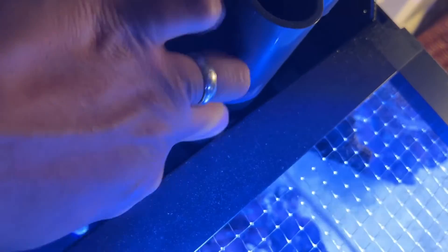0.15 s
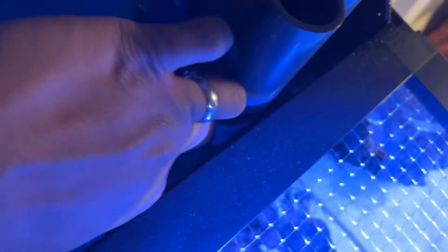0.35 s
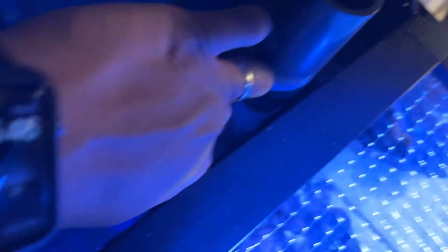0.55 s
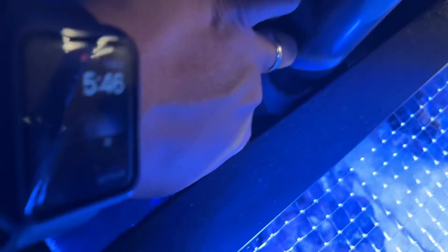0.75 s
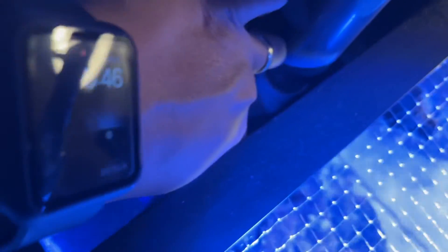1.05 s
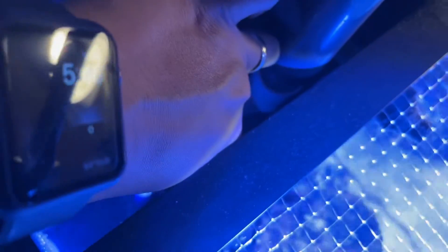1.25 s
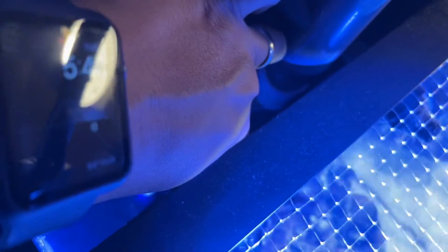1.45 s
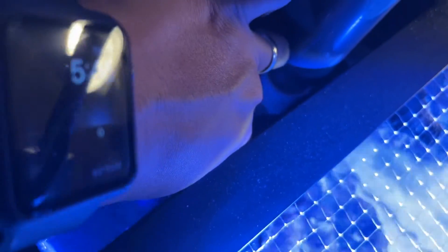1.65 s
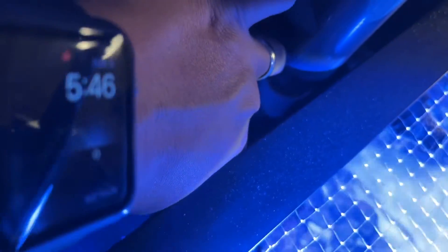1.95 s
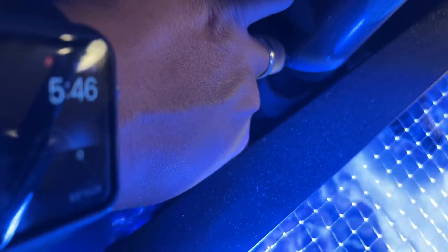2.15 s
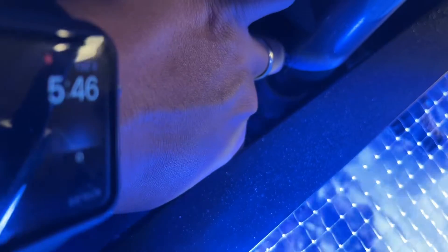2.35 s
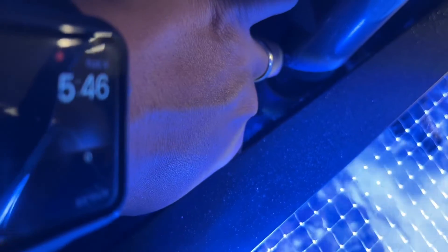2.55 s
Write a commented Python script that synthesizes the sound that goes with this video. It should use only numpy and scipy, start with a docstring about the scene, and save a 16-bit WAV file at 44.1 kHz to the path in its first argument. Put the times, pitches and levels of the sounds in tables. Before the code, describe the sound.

Trickling water with bubbly plips and small splashes in a tank, a pump humming and ticking underneath

```python
"""A pump hums at twice the mains rate, close over the narrow rear chambers of an aquarium: a wavering sine,
fluttering noise bands and a rumble. Something on it ticks eleven times a second, as short damped knocks.
Water trickles over the baffles: drips and bubbles are damped sines, splashes and hiss are shaped noise.
Two microphone ports hear the water out of step at many pitches."""
import sys
import numpy as np
from scipy import signal
from scipy.fft import rfft, irfft, next_fast_len
from scipy.io import wavfile
from scipy.ndimage import uniform_filter1d, map_coordinates

SR = 44100
rng = np.random.default_rng(int(sys.argv[2]) if len(sys.argv) > 2 else 0)


def transcribe(signal):
    """Save signal, clipped to [-1, 1], as a 16-bit WAV file at the path in sys.argv[1]."""
    frames = np.atleast_2d(signal).T
    limited = np.clip(frames, -1, 1)
    pcm = np.round(limited * 32767).astype(np.int16)
    wavfile.write(sys.argv[1], SR, pcm)


N = 119070


def amp(db):
    """Amplitude factor of a level in dB."""
    return 10 ** (np.asarray(db) / 20)


def unit(x):
    """x scaled to an RMS of 1 over all its channels."""
    return x / np.sqrt(np.mean(x ** 2) + 1e-20)


def along(points, hz):
    """Interpolate (Hz, value) points on a log frequency axis."""
    f, v = np.transpose(points)
    return np.interp(np.log(hz + 1), np.log(f + 1), v)


def wobble(knots_per_s):
    """A smooth random curve through normally distributed knots."""
    knots = rng.standard_normal(int(N * knots_per_s / SR) + 4)
    return map_coordinates(knots, [np.arange(N) * knots_per_s / SR])


def filtered(x, response):
    """x through a complex response of frequency in Hz."""
    size = next_fast_len(N + SR // 2)
    spectrum = rfft(x, size) * response(np.fft.rfftfreq(size, 1 / SR))
    return irfft(spectrum, size)[..., :N]


def patchy(patchy_db):
    """Two white noises sharing time-frequency patches of random gain, patchy_db RMS."""
    z = signal.stft(rng.standard_normal((2, N)), nperseg=512)[2]
    field = uniform_filter1d(rng.standard_normal(z.shape[1:]), size=5, axis=0)
    field = uniform_filter1d(field, size=6, axis=1)
    return signal.istft(z * amp(patchy_db * unit(field)), nperseg=512)[1][:, :N]


def random_db(u, spread_db):
    """Exponentially spread levels from uniform draws u, capped at the top."""
    return -spread_db * np.log(1 - .985 * u)


def pings(s, db, hz, t60_s, attack_s, rise, size=2048):
    """Damped sines whose pitch climbs by the share rise over a t60."""
    t = np.arange(size) / SR
    s, db, hz, t60_s = (np.asarray(v, float)[:, None] for v in (s, db, hz, t60_s))
    tone = np.sin(2 * np.pi * hz * (t + rise * t * t / (2 * t60_s)))
    wave = amp(db - 60 * t / t60_s) * (1 - np.exp(-t / attack_s)) * tone
    at = (s * SR).astype(int) + np.arange(size)
    return np.bincount(at.ravel(), wave.ravel(), N + SR)[:N]


HUM_HZ, HUM_START_RAD, HUM_DRIFT_RAD = 120, 3.75, .08
RUMBLE_DB = -46.5
# Hum level. Each row: time in seconds, RMS level ahead of the ports in dB.
HUM_LEVEL = [(0.0, -38.5), (0.04, -36), (0.3, -36), (0.96, -38.5), (1.07, -37.5), (1.19, -40),
             (1.44, -37.5), (2.65, -37.5), (2.7, -38)]
# Motor rumble through the stand. Each row: frequency in Hz, relative density in dB per Hz.
RUMBLE_SPECTRUM = [(20, -81), (30, -40), (58, -2.5), (68, -13.5), (100, -6.5), (150, -1), (200, -4.5),
                   (300, -9.5), (400, -15), (520, -21), (800, -26.5), (1500, -97)]
# Fluttering motor tones. Each row: centre in Hz, width in Hz (centre to e^-2 amplitude), RMS level in dB.
WHIRR_BANDS = [(80.8, 2.8, -56.5), (136.5, 22, -50), (179.7, 11, -53.5), (219.6, 10.4, -59),
               (298.8, 5.4, -62.5)]


def pump():
    """Motor vibration: a slightly wavering hum, narrow noise bands that flutter and a broad rumble."""
    t = np.arange(N) / SR
    phase = 2 * np.pi * HUM_HZ * t + HUM_START_RAD + HUM_DRIFT_RAD * wobble(5.6)
    hum_db = np.interp(t, *np.transpose(HUM_LEVEL))
    hum = np.sqrt(2) * amp(hum_db) * np.sin(phase)
    shaped = filtered(patchy(patchy_db=.7), lambda f: amp(along(RUMBLE_SPECTRUM, f)))
    motor = amp(RUMBLE_DB) * unit(shaped)
    for hz, width_hz, db in WHIRR_BANDS:
        noise = rng.standard_normal((2, N))
        band = filtered(noise, lambda f: np.exp(-2 * ((f - hz) / width_hz) ** 2))
        motor = motor + amp(db) * unit(band)
    return motor + hum * [[1], [0]]  # hum only in the shared signal


TICK_SCATTER_DB, TICK_PITCH_SCATTER, TICK_JITTER_S = 2.5, .05, .0005
TICK_PAN_DB = 3.5  # up on the left, down on the right
TICK_ECHO_S, TICK_ECHO_DB = .0068, -3  # off the glass into the right port
# The ticks. Each row: start in seconds, nominal level in dB ahead of scatter and pan.
TICK_TIMES = [(0.0258, -43), (0.1156, -40.5), (0.2064, -41.5), (0.2947, -40.5), (0.3825, -43),
              (0.4708, -40.5), (0.5581, -40.5), (0.6464, -45.5), (0.7342, -44.5), (0.8235, -42),
              (0.9123, -44), (1.0021, -44.5), (1.0929, -44), (1.1812, -40.5), (1.268, -46), (1.3563, -44),
              (1.4441, -43.5), (1.5349, -45.5), (1.6254, -44.5), (1.7125, -44), (1.8043, -43.5),
              (1.8941, -42), (1.9819, -42.5), (2.0687, -43), (2.1575, -45), (2.2433, -42), (2.3311, -40.5),
              (2.4214, -44), (2.5112, -46), (2.5985, -44), (2.6874, -42.5)]
# Partials of a tick. Each row: nominal pitch in Hz, level over the tick's in dB, t60 in s, delay in s.
TICK_PARTIALS = [(1300, 4, .013, 0), (1100, 1, .012, .0015), (880, 1, .02, .0035), (740, -4, .02, .005)]


def ticking():
    """A nearly regular tick that falls from a higher to a lower knock, nearer the left port."""
    s, db = np.transpose(TICK_TIMES)
    left = np.zeros(N)
    for hz, level_db, t60_s, delay_s in TICK_PARTIALS:
        db_luck, hz_luck, time_luck = rng.standard_normal((3, len(s)))
        left += pings(s + delay_s + TICK_JITTER_S * time_luck,
                      db + level_db + TICK_SCATTER_DB * db_luck,
                      hz * (1 + TICK_PITCH_SCATTER * hz_luck),
                      np.full(len(s), t60_s), attack_s=.00059, rise=0)
    echo = np.pad(left, (round(TICK_ECHO_S * SR), 0))[:N]
    right = left + amp(TICK_ECHO_DB) * echo
    return np.array([left, right]) * amp([[TICK_PAN_DB], [-TICK_PAN_DB]])


DRIP_HZ, DRIP_SCATTER, DRIP_T60_S = 1530, .015, .03
RING_HZ, RING_DB, RING_T60_S = 1560, -15.5, .12  # level relative to the drip
# Drips that ring the air in one chamber. Each row: start in seconds, knock level in dB.
DRIP_TIMES = [(.540, -33.5), (.552, -38), (0.576, -28.5), (.602, -45), (0.732, -42), (.980, -40),
              (1.035, -36), (1.076, -38), (1.11, -35), (1.126, -35.5), (1.560, -34), (1.577, -25.5),
              (1.609, -32), (1.624, -43), (1.643, -45), (1.675, -36), (1.701, -41), (1.731, -42),
              (1.757, -40), (1.777, -33.5), (1.826, -48), (1.863, -44), (1.984, -34), (2.122, -31.5),
              (2.170, -39), (2.231, -34), (2.305, -35.5), (2.360, -44), (2.393, -42), (2.469, -40),
              (2.523, -45)]


def drips():
    """Every drip knocks a hollow note out of step at the ports; a thinner note lingers in both alike."""
    s, db = np.transpose(DRIP_TIMES)
    one = np.ones(len(s))
    hz = DRIP_HZ * (1 + DRIP_SCATTER * rng.standard_normal(len(s)))
    knock = pings(s, db, hz, DRIP_T60_S * one, attack_s=.0015, rise=.012)
    ring = pings(s, db + RING_DB, RING_HZ * one, RING_T60_S * one, attack_s=.0074, rise=0, size=6144)
    return ports(walls(knock)) + ring


POP_DB, POP_OCTAVES, POP_SHORTER = -6, .2, 2.5  # level and t60 divisor relative to the bubble
# The clearest bubbles. Each row: start in seconds, level in dB, starting pitch in Hz, t60 in ms.
BUBBLE_EVENTS = [(0.033, -39, 715, 26), (0.111, -37, 12900, 9.5), (0.112, -46, 2640, 18),
                 (0.147, -38, 965, 20), (0.154, -51, 2540, 25), (0.166, -48, 2540, 25),
                 (0.2606, -29.5, 4430, 6.7), (0.2641, -50, 14210, 10), (0.2651, -38, 11900, 8.9),
                 (0.3085, -43, 7160, 12), (0.3314, -41, 7160, 11), (0.3384, -49, 14130, 10),
                 (0.3559, -39, 8300, 14), (0.3563, -34.5, 9800, 7.8), (0.373, -35.5, 1730, 11),
                 (0.3898, -48, 8480, 10), (0.3998, -47, 8400, 22), (0.404, -36, 11100, 6.4),
                 (0.4133, -44, 7760, 8), (0.415, -35.5, 718, 37), (0.457, -42, 2400, 18),
                 (0.477, -47, 2520, 17), (0.4691, -52, 14660, 8), (0.4856, -41, 7000, 10),
                 (0.5022, -43, 4460, 14), (0.5624, -55, 8200, 14), (0.5679, -41.5, 6050, 11),
                 (0.6434, -37, 1670, 26), (0.6592, -42, 2120, 22), (0.6694, -45.5, 4500, 20),
                 (0.7635, -35, 717, 66), (0.833, -38.5, 5770, 13.6), (0.837, -42.5, 1670, 30),
                 (0.839, -36.5, 950, 23), (0.8642, -42, 8440, 8), (0.9017, -34.5, 1810, 21.5),
                 (0.9076, -38, 4200, 12), (0.95, -45, 2600, 18), (1.034, -45, 2400, 18),
                 (1.0353, -42, 4940, 15), (1.0515, -41.5, 4180, 21), (1.1092, -42, 11850, 13),
                 (1.1301, -47, 13200, 12), (1.1803, -31, 6070, 6.2), (1.22, -41, 1940, 19),
                 (1.2213, -27.5, 3250, 12.5), (1.2384, -43, 6080, 22), (1.3227, -38, 5860, 10.5),
                 (1.4374, -41, 7170, 11), (1.4595, -33, 2650, 13), (1.5083, -40, 9900, 9.4),
                 (1.5337, -26, 7660, 7.3), (1.562, -44, 1800, 20), (1.6, -41, 1700, 24),
                 (1.619, -43, 11580, 8), (1.6789, -39, 14400, 11), (1.6887, -16.5, 8900, 5.2),
                 (1.746, -46, 2540, 28), (1.7873, -36, 5620, 8.3), (1.848, -39.5, 720, 39),
                 (1.8754, -40, 5600, 9.4), (1.8872, -35.5, 5600, 7.4), (2.023, -32.5, 940, 23),
                 (2.0665, -35, 9700, 9.6), (2.1397, -37, 5920, 8.6), (2.221, -33.5, 5920, 7.4),
                 (2.325, -42, 1830, 20), (2.36, -41.5, 1765, 22), (2.3638, -42, 4220, 16),
                 (2.4033, -33, 4510, 7.8), (2.5249, -31.5, 973, 28), (2.531, -45, 5960, 11)]


def bubbles():
    """A bubble rings on a slightly rising pitch; two shorter, detuned pings make its rough pop."""
    s, db, hz, t60_ms = np.transpose(BUBBLE_EVENTS)
    t60_s = t60_ms / 1000
    x = pings(s, db, hz, t60_s, attack_s=.001, rise=.012)
    for detune in rng.standard_normal((2, len(s))):
        pop_hz = hz * 2 ** (POP_OCTAVES * detune)
        x += pings(s, db + POP_DB, pop_hz, t60_s / POP_SHORTER, attack_s=.00054, rise=0)
    return x


# Each row: start in seconds, level in dB (10 above burst RMS), centre in Hz, sigma in octaves, t60 in ms.
SPLASH_EVENTS = [(0.4587, -17.5, 9500, 1.6, 5.6), (0.598, -41, 2100, .3, 47), (0.902, -38, 2200, 0.73, 14),
                 (1.071, -28.5, 11000, 0.44, 11.3), (1.128, -37, 2280, 0.19, 29),
                 (1.2193, -19, 4230, .85, 12.5), (1.556, -40, 1900, 0.33, 42),
                 (1.581, -29.5, 8500, 0.42, 10.5), (1.6785, -35, 12500, .4, 11),
                 (1.873, -37, 13000, .4, 9.4), (2.305, -42, 1900, .3, 45), (2.3552, -32.5, 6500, 0.32, 8.7),
                 (2.394, -23.5, 10700, 0.18, 8), (2.454, -43, 14000, .3, 8)]


def splashes():
    """A splash is a short decaying burst of noise in a bell-shaped band."""
    x = np.zeros(N)
    t, f = np.arange(1024) / SR, np.fft.rfftfreq(1024, 1 / SR)
    for s, db, hz, octaves, t60_ms in SPLASH_EVENTS:
        band = np.exp(-.5 * (np.log2((f + 1) / hz) / octaves) ** 2)
        burst = unit(irfft(rfft(rng.standard_normal(len(t))) * band))
        envelope = amp(db - 10 - 60000 * t / t60_ms) * (1 - np.exp(-t / .00066))
        x[round(s * SR):][:len(t)] += envelope * burst
    return x


BURBLE_DB, BURBLE_PER_S, BURBLE_SPREAD_DB = -60, 220, 3
BURBLE_LOW_HZ, BURBLE_HIGH_HZ, BURBLE_CYCLES = 650, 2600, 26  # mean cycles per t60


def burble():
    """Larger bubbles scattered through the flow, the lower ones louder by 5 dB an octave."""
    when, pitch, loud, long = rng.random((4, int(BURBLE_PER_S * N / SR)))
    hz = BURBLE_LOW_HZ * (BURBLE_HIGH_HZ / BURBLE_LOW_HZ) ** pitch
    db = random_db(loud, BURBLE_SPREAD_DB) - 5 * np.log2(hz / 1000)
    t60_s = BURBLE_CYCLES * (.5 + long) / hz
    x = pings(when * N / SR, db, hz, t60_s, attack_s=.001, rise=.05)
    return amp(BURBLE_DB) * unit(walls(x))


HISS_DB, FIZZ_DB = -51.5, -58  # RMS ahead of the flow's swing
FIZZ_PER_S, FIZZ_SPREAD_DB = 1500, 2
FIZZ_LOW_HZ, FIZZ_HIGH_HZ, FIZZ_CYCLES_AT_1KHZ = 606, 15400, 13  # mean cycles per t60
# Running water as the chambers colour it. Each row: frequency in Hz, relative density in dB per Hz.
CHAMBER_COLOUR = [(300, -40), (580, -11), (640, -8), (710, 0), (800, -3), (1050, -3), (1150, -9),
                  (1270, -8), (1310, -2), (1350, -8), (1440, -8), (1550, -3), (1620, -9), (1700, -14),
                  (1900, -17), (2150, -18), (2280, -16), (2450, -18), (2560, -13), (2680, -17), (2900, -20),
                  (3100, -18), (3450, -21), (3800, -20), (4400, -19), (6000, -21), (7300, -24),
                  (8300, -18.5), (8700, -20), (8950, -17.5), (9400, -22), (11000, -23.5), (15400, -26),
                  (16500, -27)]
# Flow, used relative to its mean. Each row: time in seconds, level in dB.
FLOW_LEVEL = [(0.0, -57), (0.52, -56.5), (0.68, -59), (0.9, -58.5), (1.19, -57.5), (1.66, -57.5),
              (1.92, -59), (2.38, -57.5), (2.7, -59.5)]


def trickle():
    """Hiss and a crowd of tiny bubbles of many sizes, both coloured by the chamber and following the flow."""
    when, pitch, loud, long = rng.random((4, int(FIZZ_PER_S * N / SR)))
    hz = FIZZ_LOW_HZ * (FIZZ_HIGH_HZ / FIZZ_LOW_HZ) ** pitch
    t60_s = FIZZ_CYCLES_AT_1KHZ * (.5 + long) * (hz / 1000) ** .83 / hz
    db = random_db(loud, FIZZ_SPREAD_DB)
    fizz = pings(when * N / SR, db, hz, t60_s, attack_s=.00054, rise=.064, size=768)
    colour = lambda f: amp(along(CHAMBER_COLOUR, f))
    fizz = unit(filtered(walls(fizz), lambda f: colour(f) * (f / 1000) ** .71))
    hiss = unit(filtered(patchy(patchy_db=2.5), colour))
    s, level_db = np.transpose(FLOW_LEVEL)
    flow_db = np.interp(np.arange(N) / SR, s, level_db - level_db.mean())
    flow = amp(flow_db + .83 * wobble(9.14))
    return flow * (amp(HISS_DB) * hiss + amp(FIZZ_DB) * fizz)


SPRAY_DB, SPRAY_PER_S, SPRAY_SPREAD_DB = -68, 150, 3.5
SPRAY_HZ, SPRAY_OCTAVES, SPRAY_T60_S = 10500, 1.6, .0012  # centre, full range


def spray():
    """Fine droplets burst as broad, very short treble ticks."""
    when, pitch, loud = rng.random((3, int(SPRAY_PER_S * N / SR)))
    hz = SPRAY_HZ * 2 ** (SPRAY_OCTAVES * (pitch - .5))
    db, t60_s = random_db(loud, SPRAY_SPREAD_DB), np.full(len(hz), SPRAY_T60_S)
    x = pings(when * N / SR, db, hz, t60_s, attack_s=.0001, rise=0, size=256)
    return amp(SPRAY_DB) * unit(walls(x))


WALLS_DB, WALLS_T60_S = -12, .035


def walls(x):
    """Two signals: the sound with its short echo in the chamber, and another such echo alone."""
    t = np.arange(SR // 10) / SR
    tails = rng.standard_normal((2, len(t))) * amp(-60 * t / WALLS_T60_S)
    tails = tails / np.linalg.norm(tails[0])
    echo = signal.fftconvolve(x[None], tails, axes=1)[:, :N]
    return np.array([x + amp(WALLS_DB) * echo[0], echo[1]])


# Each row: frequency in Hz, phase lead of left over right in rad.
PORT_LEAD = [(0, 0), (950, .8), (1290, 1.9), (1450, 2.8), (1620, 3.5), (1720, 6), (1810, 6.3), (2930, 7),
             (4130, 6.3), (4740, 6.8), (5700, 5.1), (6800, 4.7), (7670, 3.2), (8610, 3.1), (9390, 2.6),
             (10200, 1.4), (11100, .2), (12900, 0), (13700, -1.4), (14600, -3), (16000, -3.3)]
# Each row: frequency in Hz, likeness of the ports (0 to 1).
PORT_LIKENESS = [(35, .96), (60, 1), (120, 1), (250, 0.95), (600, 0.73), (1200, 0.22), (1600, 1),
                 (1850, 0.51), (2300, 1), (3000, 0.12), (5000, 0.74), (8500, 1), (12000, 0.51), (15000, 1)]
# Each row: frequency in Hz, left over right in dB.
PORT_TILT = [(60, 0.5), (130, 1), (290, 2.0), (640, 2.5), (1410, 2.5), (3100, 1.5), (6820, 1), (15000, -2)]


def ports(pair):
    """Mix a shared and an unshared signal into two ports that differ in level and phase with frequency."""
    lead_hz, lead_rad = np.transpose(PORT_LEAD)

    def share(hz):
        turn = np.arccos(np.clip(along(PORT_LIKENESS, hz), 0, 1)) / 2
        return np.array([np.cos(turn), np.sin(turn)])

    def split(hz):  # half of the difference goes to each port
        half = amp(along(PORT_TILT, hz) / 2) * np.exp(.5j * np.interp(hz, lead_hz, lead_rad))
        return np.array([half, 1 / half])

    shared, unshared = filtered(pair, share)
    return filtered(np.array([shared + unshared, shared - unshared]), split)


def scene():
    """Pump and water through the ports, plus drips and ticks that are already in stereo."""
    drops = walls(bubbles() + splashes())
    through_ports = ports(pump() + drops + burble() + trickle() + spray())
    return through_ports + ticking() + drips()


TOP_HZ = 15750


def record(dry):
    """Nothing passes from the band limit up."""
    return filtered(dry, lambda hz: hz < TOP_HZ)


dry = scene()
out = record(dry)
transcribe(out)
```